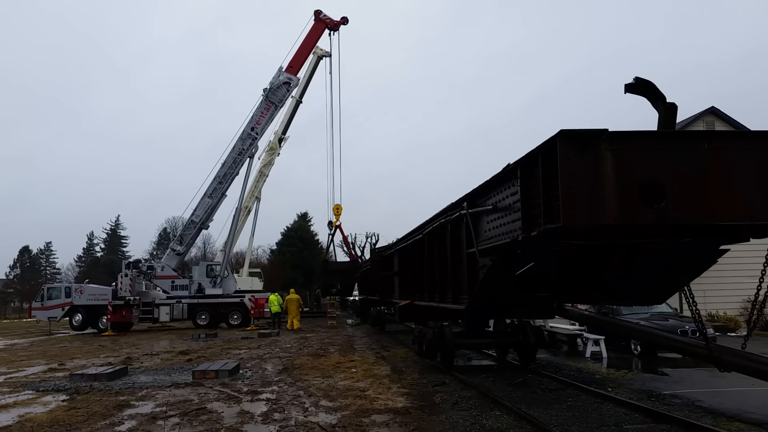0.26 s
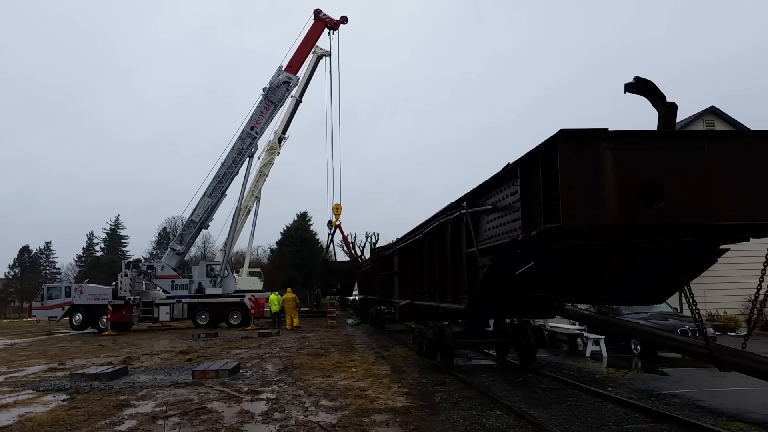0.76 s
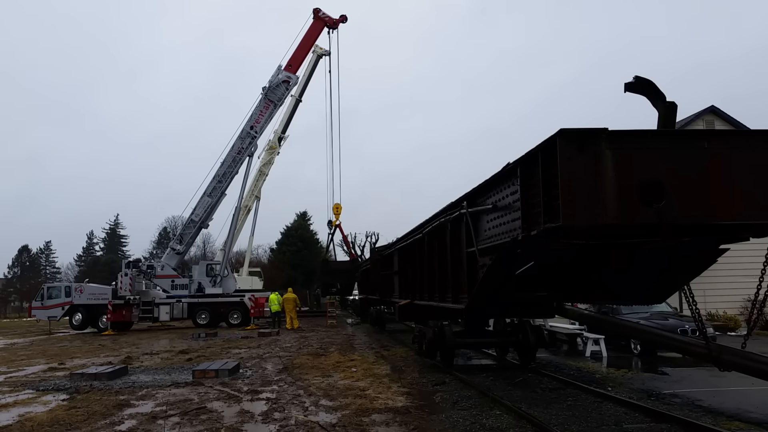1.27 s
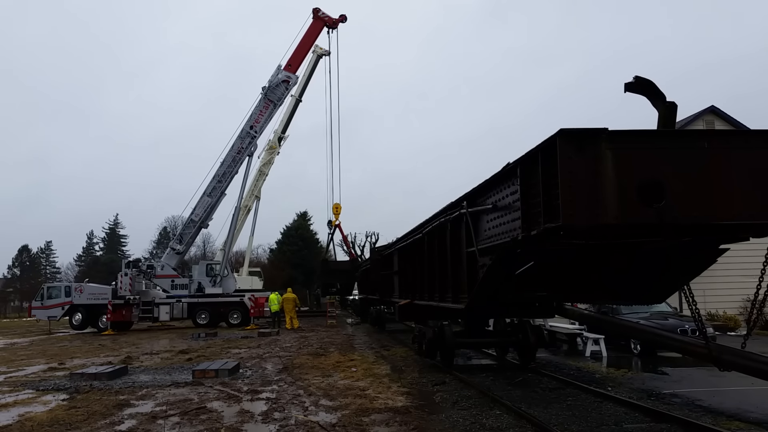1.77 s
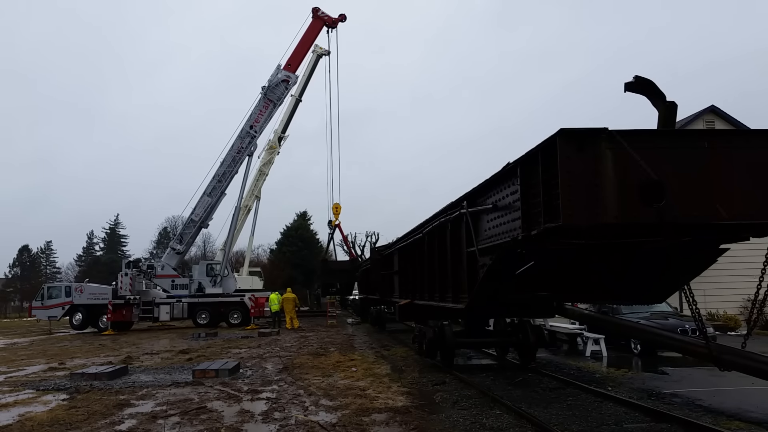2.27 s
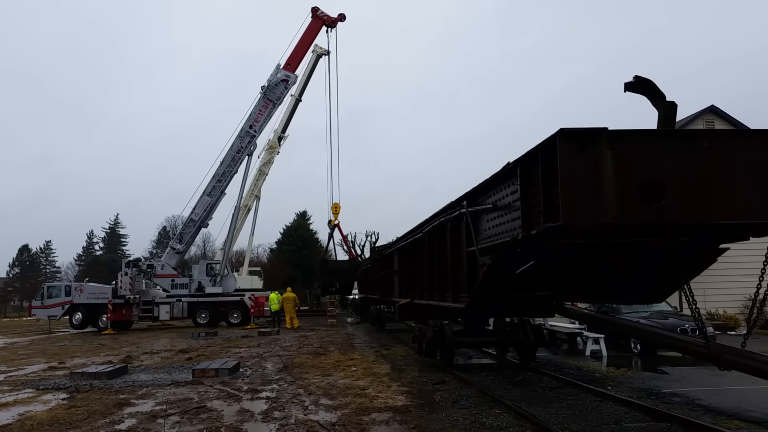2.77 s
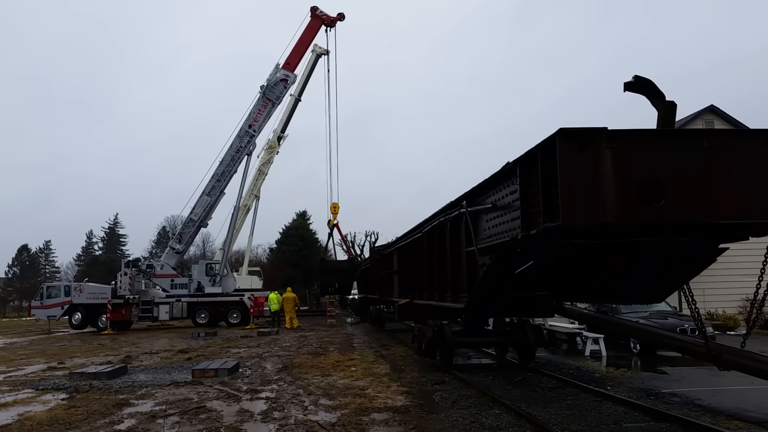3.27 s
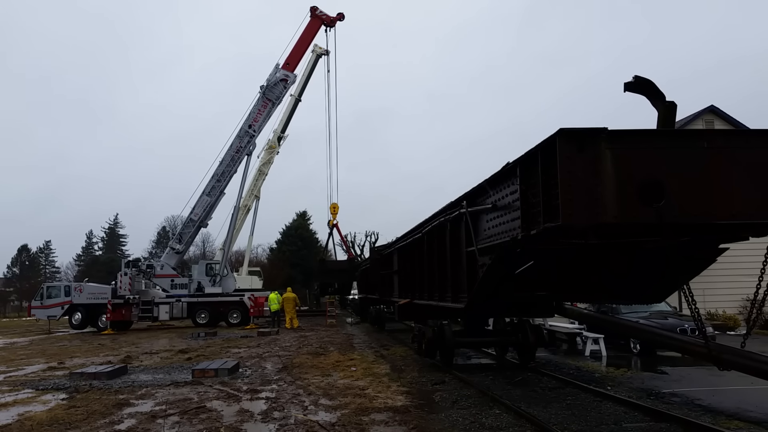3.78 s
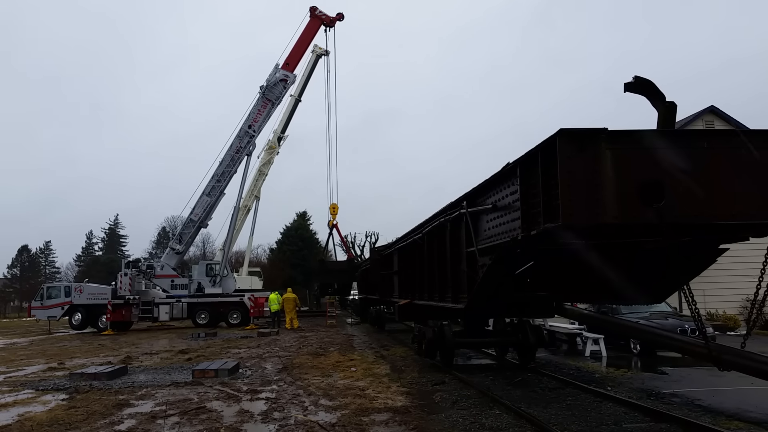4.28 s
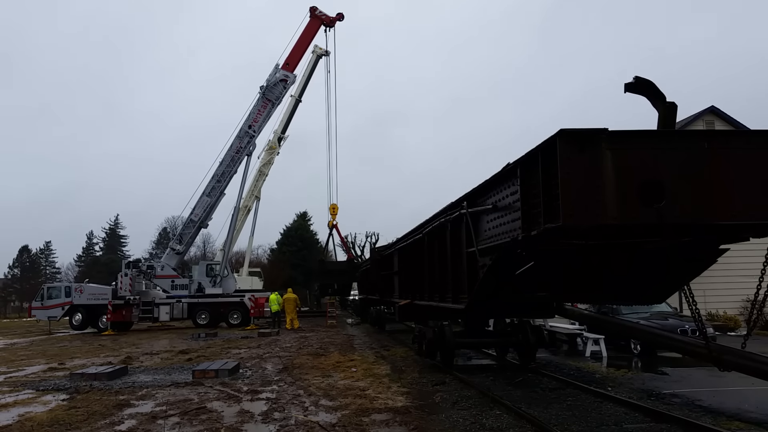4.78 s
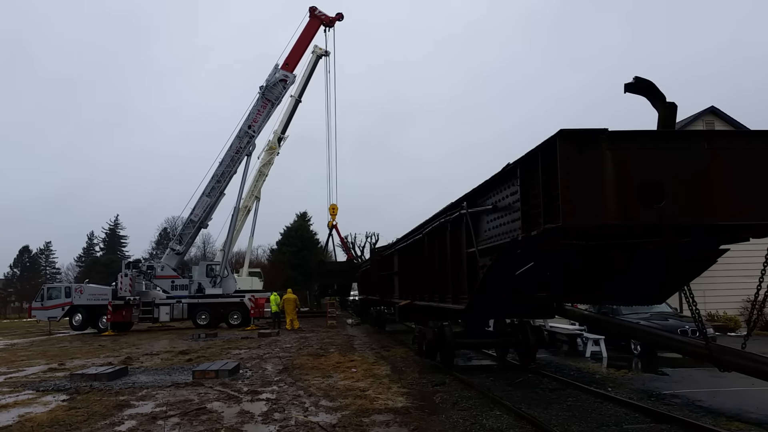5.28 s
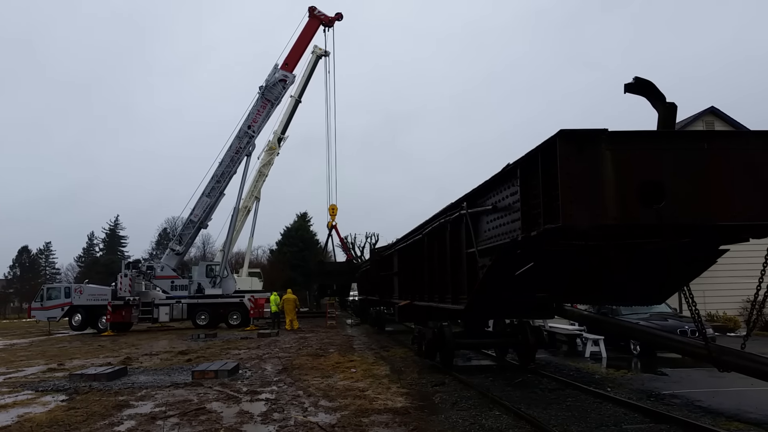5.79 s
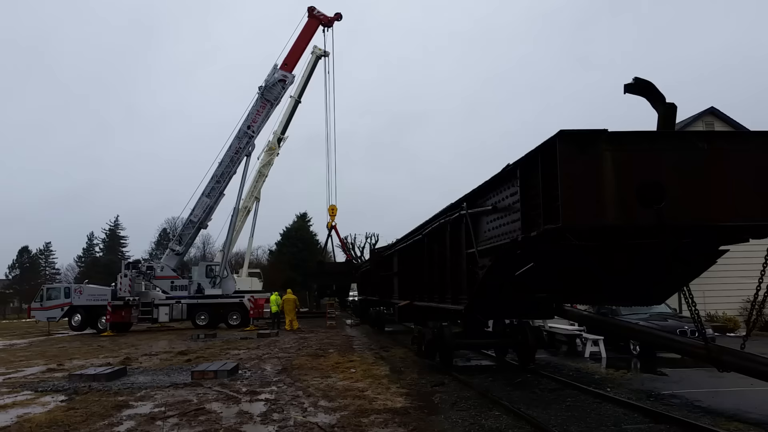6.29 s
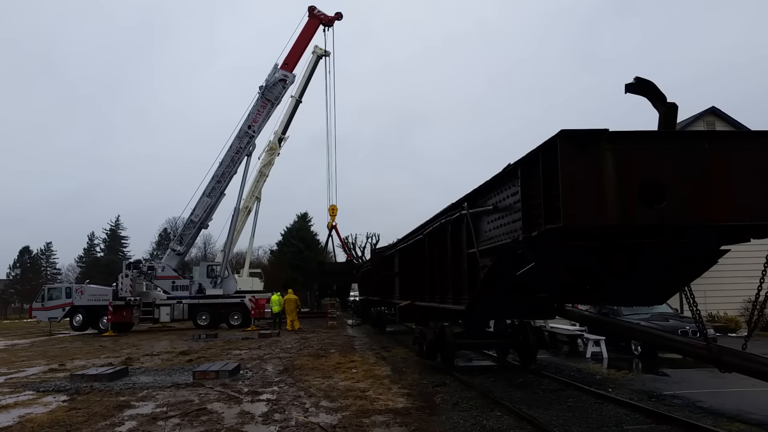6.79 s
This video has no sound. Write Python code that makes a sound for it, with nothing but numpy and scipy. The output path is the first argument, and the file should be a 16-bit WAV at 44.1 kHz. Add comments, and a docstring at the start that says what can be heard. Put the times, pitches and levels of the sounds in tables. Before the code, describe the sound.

Wind hits a camera's microphones hard, with deep uneven rumble, rasp and thumps differing left and right. Behind it a crane engine runs continuously, with a pump drone around middle C, a drifting fan tone and thin high whines. The background starts subdued, grows fuller and hissier, then drops away around six seconds, leaving dull overloaded gusts and crackling pops at left. Scattered raindrops click close by.

```python
"""Wind buffets a camera's two microphone ports, each on its own: shaped noise, with pops and crackle on the left.
Behind it a mobile crane works some way off beside a rail track: filtered-noise diesel roar and clatter,
a pump whine that comes and goes in waves and thin whistles on one shaft, beside a free, drifting fan tone.
Raindrops ring the camera body with short decaying modes, and spray clicks on the right port.
The whole background swells and sinks, and the hardest gusts round off in a dull overload."""
import sys
import numpy as np
from scipy import signal
from scipy.fft import rfft, irfft
from scipy.io import wavfile
from scipy.ndimage import uniform_filter1d

SR = 44100
rng = np.random.default_rng(int(sys.argv[2]) if len(sys.argv) > 2 else 0)


def transcribe(signal):
    """Save signal, clipped to [-1, 1], as a 16-bit WAV file at the path in sys.argv[1]."""
    frames = np.atleast_2d(signal).T
    limited = np.clip(frames, -1, 1)
    pcm = np.round(limited * 32767).astype(np.int16)
    wavfile.write(sys.argv[1], SR, pcm)


N = 310905
TIME = np.arange(N) / SR
HZ = np.fft.rfftfreq(N, 1 / SR)

# Guide for the swell of the whole background, as a high-hiss level: t/s, level/dB
SWELL = [(.03, -68), (.45, -68), (.65, -62.5), (.96, -59.5), (1.5, -56), (1.8, -56), (2.02, -54.5),
         (2.07, -58), (2.5, -59.5), (3, -58.5), (3.06, -54), (3.25, -55), (3.62, -52.3), (3.85, -54),
         (4.24, -51.3), (4.42, -51.8), (4.61, -50), (4.75, -51.5), (5.05, -50), (5.6, -50.5), (5.78, -51.5),
         (5.88, -55), (6.02, -59), (6.2, -69.5), (6.5, -68), (7, -71)]
SWELL_FULL_DB = -50.5  # guide level at which the background is at full strength
SWELL_WAVER_DB, SWELL_WAVER_HZ = 1.5, 2  # the background wavers a little by chance
# Brief surges of the whole background: t/s, rise/dB
SURGES = [(1.688, 4), (5.73, 1.5), (5.95, 2)]
SURGE_WIDTH_S = 0.017
# Wafts of wind that bring the crane nearer: t/s, half length/s, rise/dB
WAFTS = [(1.7, 0.19, 1), (4.206, 0.32, 1.5)]

# Microphone hiss before the swell: f/Hz, level/dB per Hz
HISS = [(5000, -125), (8700, -110), (10000, -102), (12300, -88.5), (14600, -82.5), (15800, -81.5)]
HISS_RIGHT_DB = 2.6  # extra hiss on the right
EDGE_HZ = 15900  # upper band limit

# Roar of the diesel and its fan at full swell: f/Hz, left level/dB per Hz, right level/dB per Hz
ROAR = [(59, -64, -59.5), (138, -57.5, -52), (248, -47.5, -46.5), (408.5, -55, -52), (423, -61, -64),
        (580, -64.5, -61), (770, -66.5, -69.5), (1300, -79, -80), (2110, -75, -78.5), (2300, -81.5, -88),
        (3050, -76.5, -78.5), (2860, -85, -86.5), (4350, -76, -90), (5200, -80.5, -104.5),
        (5430, -90.5, -101), (7370, -92.5, -104), (8800, -110, -110)]
# How alike the two ports hear the roar: f/Hz, likeness/0-1
LIKENESS = [(60, 0.06), (300, 1), (640, 0.8), (1400, 0.5), (3000, 0.4), (6000, 0.08)]
PORT_DELAY = 0.00011  # s by which the left port leads
# Resonances of the engine block: f/Hz, width/Hz, left level/dB per Hz
ENGINE_BLOCK = [(1075, 770, -74), (1810, 280, -76), (2120, 300, -81), (2740, 210, -83.5)]

PUMP_HZ, FIRING_HZ = 266.9, 123.1  # nominal, before the slight wander of the shaft
# Base level of the pump's fundamental: left level/dB, right level/dB
PUMP_DB = [-25.5, -24.5]
# Waves in the pump's hum, added to its base level: t/s, level/dB
PUMP_LEVEL = [(0, -2.5), (.5, -9.5), (1, -2), (1.3, -4), (1.63, 5), (1.85, -3), (2.3, -0.5), (2.48, -7),
              (2.9, -1), (3.08, -6.5), (3.33, 4), (3.7, 0), (3.97, -4.5), (4.15, 3), (4.38, 3.5), (4.55, 1),
              (5.1, 3.5), (5.42, 4), (5.66, 0), (5.8, -5.5), (6.25, -16), (7.05, -10.5)]
# Overtones of the pump whine: multiple of PUMP_HZ, left level/dB, right level/dB
PUMP_OVERTONES = [(2, -44.5, -42.5), (3, -51, -51.5)]
# Partials of the diesel's firing: multiple of FIRING_HZ, left level/dB, right level/dB
FIRING = [(3, -32, -32), (4, -51, -51), (5, -61.5, -57), (6, -52.5, -47), (7, -69, -65.5)]
# Thin whistles of gears and valves: f/Hz, left level/dB, right level/dB
WHISTLES = [(872, -60, -60), (1035, -63, -70), (1114, -62, -69), (1253, -59, -64), (1722, -60, -68),
            (2899, -67, -70), (2958, -68, -69), (3008, -64.5, -63), (3035, -71, -71), (3690, -72, -74),
            (4243, -71, -80), (4615, -65, -80), (4677, -65, -78), (4736, -69, -80)]
# Blade tone of the cooling fan, drifting with its load: t/s, f/Hz
FAN = [(0, 370.6), (.9, 371.6), (1.8, 385.2), (2.7, 383), (3.5, 374.6), (4.5, 381), (5.4, 372.2),
       (7.05, 374)]
FAN_DB = -41
# The whistles and the clatter sink, and stay down, in the last hard gusts
DIP_DB, DIP_S, DIP_LENGTH_S = -3.5, 6.0, .25

# Raindrops on the camera body: t/s, left peak/dB, favoured f/Hz, spread/octaves, ring/multiple of usual
DROPS = [(0.7432, -26, 3860, 0.44, 2.2), (2.0303, -26, 3000, 2.7, 1), (2.9489, -15, 1400, 1.3, 1.5),
         (3.1134, -9.5, 2720, 0.69, 1.4), (3.185, -24, 2500, 2, 1), (3.8897, -17, 4300, 0.98, 2),
         (4.008, -26, 2400, 1, 1), (4.529, -23, 4200, 1, 1), (4.659, -20, 4500, .8, 1),
         (4.918, -24, 3300, 1.5, 1), (5.165, -19.5, 4400, .8, 1.3), (5.192, -25, 4500, .6, 1.3),
         (6.0558, -22, 4600, .45, 1.3), (6.062, -14, 2000, 1.6, 1), (6.1112, -27.5, 4000, 0.56, 1.6),
         (6.131, -36, 4300, .7, 1), (6.7312, -33, 4200, .7, 1), (6.8931, -26, 2800, 1.4, 1)]
# Modes a drop rings in the camera body: nominal f/Hz, level/dB, usual t60/s
CAMERA_MODES = [(1100, -15.5, 0.0029), (1900, -2.5, 0.0014), (2640, -4, 0.003), (3130, -6, 0.0032),
                (3810, 0.5, 0.004), (4630, -0.5, 0.0026)]
# Fine spray ticks on the right port: t/s, peak/dB
SPRAY = [(.936, -33), (1.452, -29), (2.03, -35), (2.29, -33), (2.396, -34), (3.151, -22), (5.581, -18),
         (6.201, -38)]

# Single eddies that slap a port: t/s, port/0 left 1 right, relative level/dB, upper edge f/Hz, half length/s
BUFFETS = [(0.477, 1, -22.5, 297, 0.0056), (0.508, 1, -17.5, 288, 0.0029), (1.526, 0, -18, 380, 0.0052),
           (1.752, 0, -17.5, 268, 0.0069), (2.408, 0, -30, 300, 0.0012), (2.505, 0, -21, 333, 0.0089),
           (2.997, 1, -13.5, 181, 0.0046), (5.827, 0, -17, 418, 0.0012), (5.889, 0, -12, 280, 0.0032),
           (5.952, 0, -21, 350, 0.0015), (6.022, 0, -18.5, 350, 0.002), (6.074, 1, -18, 534, 0.0042),
           (6.091, 1, -16, 324, 0.0038), (6.114, 0, -24, 497, 0.0019), (6.174, 0, -42, 401, 0.0018),
           (6.193, 0, -19, 276, 0.0023), (6.256, 0, -22, 391, 0.0029), (6.337, 0, -13, 251, 0.0042),
           (6.479, 0, -24.5, 397, 0.0016), (6.664, 0, -26.5, 400, 0.0042), (6.762, 0, -26.5, 560, 0.0026),
           (6.769, 0, -21, 370, 0.0011), (6.888, 0, -29, 450, 0.011), (6.934, 0, -23, 400, 0.0024)]
# Sharp pops where the airflow breaks at the left port: t/s, peak/dB, upper edge f/Hz
POPS = [(1.523, -15, 600), (2.418, -29, 700), (5.83, -14, 650), (5.886, -17.5, 700), (5.911, -21, 700),
        (6.069, -17, 1100), (6.116, -25, 1200), (6.197, -18.5, 1100), (6.1997, -9, 1700),
        (6.2220, -19, 1900), (6.225, -13, 1370), (6.257, -25.5, 900), (6.264, -25.5, 1700),
        (6.3329, -12.5, 1100), (6.34, -17.5, 1100), (6.637, -32, 700), (6.712, -19, 1030),
        (6.762, -16, 1100), (6.9077, -14, 1210), (6.931, -19, 750), (6.9425, -20, 1600), (6.959, -27, 750),
        (6.985, -27, 750), (7.019, -28, 1900), (7.0255, -13, 990), (7.036, -15, 1400)]
# Slowly changing breeze beneath the gusts: t/s, left strength/dB, right strength/dB
BREEZE = [(0, -38.5, -20), (0.799, -36.5, -33.5), (1.298, -34.5, -20), (2.2, -31, -30), (2.747, -23, -26),
          (3.601, -29, -30.5), (4.248, -27, -26.5), (5.3, -22.5, -28), (6.3, -15.5, -27),
          (7.05, -15.5, -33)]
# Separate gusts that catch a port: start t/s, length/s, port/0 left 1 right, strength/dB
GUSTS = [(0.122, 0.05, 1, -22), (0.344, 0.19, 1, -23), (0.673, 0.055, 1, -19.5), (0.89, .06, 0, -19),
         (1.085, 0.038, 0, -20.5), (1.15, 0.044, 1, -24), (1.284, .04, 1, -26.5), (1.396, 0.22, 1, -18),
         (1.443, 0.73, 0, -15), (1.889, 0.035, 1, -16.5), (2.348, 0.24, 0, -12), (2.451, .08, 1, -22),
         (2.844, 0.17, 1, -20.5), (3.067, 0.34, 0, -19), (3.724, 0.37, 0, -14.5), (4.128, 0.08, 1, -19.5),
         (4.293, 0.052, 0, -13.5), (4.397, 0.16, 1, -20.5), (4.556, 0.3, 0, -15), (4.891, 0.47, 0, -16),
         (5.481, 0.27, 0, -12), (5.774, 0.47, 0, -11.5), (5.9, 0.18, 1, -15.5), (6.423, 0.22, 1, -24.5),
         (6.783, .035, 1, -25), (6.892, 0.33, 0, -11), (6.968, 0.03, 1, -19)]
GUST_ATTACK_S, GUST_RELEASE_S = 0.035, 0.08  # every gust builds quickly, holds, and dies away
# Colour of the wind's pressure on a port: f/Hz, relative level/dB per Hz
RUMBLE = [(8, -1.5), (22, -29.5), (55, -1.5), (115, 0), (200, -7.5), (300, -29), (450, -29.5), (800, -47.5),
          (2000, -113)]
# Colour of the rasp of its small eddies: f/Hz, relative level/dB per Hz
RASP = [(90, -21.5), (175, 1), (250, 4.5), (400, -10), (650, -18), (1000, -29), (1800, -50), (4000, -78)]


def amp(db):
    """Decibels to gain."""
    return 10 ** (np.asarray(db) / 20)


def unit(x):
    """Scales to rms 1."""
    return x / np.sqrt(np.mean(x ** 2) + 1e-20)


def curve(rows):
    """Joins (s, value) rows by straight lines."""
    return np.interp(TIME, *np.transpose(rows))


def spectrum(rows, column=1):
    """Reads one column of (Hz, ..) rows on a log-frequency axis."""
    columns = np.transpose(rows)
    return np.interp(np.log(HZ + 1), np.log(columns[0]), columns[column])


def white():
    """Spectrum of white noise at 0 dB per Hz."""
    return rfft(rng.standard_normal(N)) * np.sqrt(SR / 2)


def wander(rate):
    """Slow chance movement of rms 1, up to about rate changes a second."""
    return unit(irfft(white() * (HZ > 0) / (1 + (HZ / rate) ** 4), N))


def bump(centre_s, width_s):
    """A smooth rise to 1 and back."""
    return np.exp(-((TIME - centre_s) / width_s) ** 2 / 2)


def add(track, s, sound):
    """Adds a sound to a track at time s."""
    part = track[max(round(s * SR), 0):][:len(sound)]
    part += sound[:len(part)]


def background():
    """Strength of everything behind the wind in dB: a slow swell that wavers, and a few brief surges."""
    surges = sum(db * bump(s, SURGE_WIDTH_S) for s, db in SURGES)
    return curve(SWELL) - SWELL_FULL_DB + SWELL_WAVER_DB * wander(SWELL_WAVER_HZ) + surges


def hiss(swell_db, top_follow=0.95, lower_follow=2.5, split_hz=12500):
    """High hiss, unrelated in the two microphones; below the split it fades faster than above as levels sink."""
    top_share = 1 / (1 + (split_hz / (HZ + 1)) ** 16)
    noise = np.array([amp(db) * white() * amp(spectrum(HISS)) for db in (0, HISS_RIGHT_DB)])
    top = irfft(noise * top_share, N)
    lower = irfft(noise * (1 - top_share), N)
    return amp(top_follow * swell_db) * top + amp(lower_follow * swell_db) * lower


def wafts():
    """Rise in dB as the wind carries the crane's sound toward the camera."""
    return sum(db * bump(s, width) for s, width, db in WAFTS)


def roar(shaft, swell_db, throb=0.08, flutter_db=1.0, bass_follow=0.43, treble_follow=1.027,
         air_follow=1.65, split_hz=430, air_hz=5450):
    """Engine and fan noise, pulsing with the firing and fluttering in the wind; higher bands swell more."""
    same = np.clip(spectrum(LIKENESS), 0, 1)
    left = white()
    delayed = left * np.exp(-2j * np.pi * HZ * PORT_DELAY)
    right = same * delayed + np.sqrt(1 - same ** 2) * white()
    both = np.array([left * amp(spectrum(ROAR)), right * amp(spectrum(ROAR, column=2))])
    bass = 1 / (1 + (HZ / split_hz) ** 8)
    below_air = 1 / (1 + (HZ / air_hz) ** 60)
    bands = [(bass, bass_follow), (below_air - bass, treble_follow), (1 - below_air, air_follow)]
    noise = sum(amp(follow * swell_db) * irfft(both * share, N) for share, follow in bands)
    pulse = 1 + throb * np.cos(2 * np.pi * FIRING_HZ * shaft)
    return noise * pulse * amp(flutter_db * wander(19.0))


def clatter(shaft, right_db=-5, throb=0.1):
    """Combustion knocks keep the engine block ringing: resonant noise, heard mostly at the left port."""
    power = sum(amp(2 * db) / (1 + (2 * (HZ - hz) / width) ** 2) ** 2 for hz, width, db in ENGINE_BLOCK)
    body = np.sqrt(power)
    knocks = 1 + throb * np.cos(2 * np.pi * FIRING_HZ * shaft)
    return np.array([amp(db) * knocks * irfft(white() * body, N) for db in (0, right_db)])


def tone(turns, hz, levels_db, scatter, scatter_hz):
    """A steady partial plus its share scattered by moving air and by the rail car, at both ports."""
    scattered = scatter * (wander(scatter_hz) + 1j * wander(scatter_hz))
    path = (1 + scattered) / np.sqrt(1 + 2 * scatter ** 2)
    wave = np.sqrt(2) * path * np.exp(2j * np.pi * turns)
    lag = np.exp(-2j * np.pi * hz * PORT_DELAY)
    return amp(levels_db)[:, None] * np.real([wave, wave * lag])


def whine(shaft, swell_db, dip_db, whine_follow=0.65, whistle_follow=0.41, hum_scatter=0.31):
    """Pump hum carried in waves by the wind; overtones, firing and whistles on the shaft; a free fan tone."""
    hum = tone(PUMP_HZ * shaft, PUMP_HZ, PUMP_DB, scatter=hum_scatter, scatter_hz=18)
    hum = amp(curve(PUMP_LEVEL)) * hum
    # higher overtones scatter more
    pump = sum(tone(k * PUMP_HZ * shaft, k * PUMP_HZ, db, scatter=.3 * k ** .7, scatter_hz=6)
               for k, *db in PUMP_OVERTONES)
    firing = sum(tone(k * FIRING_HZ * shaft, k * FIRING_HZ, db, scatter=2.8, scatter_hz=9)
                 for k, *db in FIRING)
    whistles = sum(tone(hz * shaft, hz, db, scatter=.33, scatter_hz=4) for hz, *db in WHISTLES)
    fan_turns = np.cumsum(curve(FAN)) / SR
    fan = tone(fan_turns, FAN[0][1], [FAN_DB, FAN_DB], scatter=0.91, scatter_hz=18)
    swelling = amp(whine_follow * swell_db) * (pump + firing + fan)
    return hum + swelling + amp(whistle_follow * swell_db + dip_db) * whistles


def drizzle():
    """About five small drops a second at random moments, louder as the background swells."""
    gap, size, colour = rng.random((60, 3)).T
    times = np.cumsum(-np.log(gap) / 5)
    swell_db = np.interp(times, *np.transpose(SWELL)) - SWELL_FULL_DB
    levels_db = swell_db - 35 + 8 * size ** 2
    return [(s, db, 2000 + 3000 * c, 1, 1) for s, db, c in zip(times, levels_db, colour)]


def drops(rows, right_db=-22):
    """Drops land by the left port and ring the camera body very briefly; each spot favours its own modes."""
    out, t = np.zeros(N), np.arange(900) / SR
    dull = signal.butter(6, 5400, fs=SR, output="sos")
    for s, db, centre_hz, octaves, ring in rows:
        tick = 0
        for hz, mode_db, t60 in CAMERA_MODES:
            decay = amp(mode_db - 60 * t / (ring * t60))
            favour = 1 / (1 + (np.log2(hz / centre_hz) / octaves) ** 2) ** 2
            tick = tick + decay * favour * np.sin(2 * np.pi * hz * rng.uniform(0.94, 1.03) * t)
        tick = signal.sosfilt(dull, tick)
        add(out, s, amp(db) * tick / abs(tick).max())
    return np.array([out, amp(right_db) * out])


def spray(low_hz=12000):
    """Tiny droplets strike the right port with a bare, high click: a band-passed impulse."""
    out = np.zeros((2, N))
    band = signal.butter(3, [low_hz, EDGE_HZ], "band", fs=SR, output="sos")
    click = signal.sosfilt(band, signal.unit_impulse(128))
    for s, db in SPRAY:
        add(out[1], s, amp(db) * click / abs(click).max())
    return out


def crackle(level_db=-17, slips_per_s=300, decay_s=0.019, low_hz=450):
    """After each pop the torn flow keeps slipping at the port: a short, uneven train of smaller pops."""
    out, t = np.zeros((2, N)), np.arange(4000) / SR
    for s, db, edge_hz in POPS:
        struck = rng.random(len(t)) < slips_per_s / SR
        slips = struck * rng.uniform(-1, 1, len(t)) * np.exp(-t / decay_s)
        band = signal.butter(2, [min(low_hz, edge_hz / 2), edge_hz], "band", fs=SR, output="sos")
        slip = signal.sosfilt(band, signal.unit_impulse(300))
        add(out[0], s, amp(db + level_db) * np.convolve(slips, slip / abs(slip).max()))
    return out


def pops(low_hz=330, rattle=0.042, rattle_s=0.0025):
    """A sudden step of pressure leaks away within a millisecond; the broken flow rattles briefly after it."""
    out, t = np.zeros((2, N)), np.arange(900) / SR
    leak = signal.butter(2, low_hz, "high", fs=SR, output="sos")
    dull = signal.butter(4, 5400, fs=SR, output="sos")
    for s, db, edge_hz in POPS:
        rise = signal.butter(3, edge_hz, fs=SR, output="sos")
        step = 1 + np.cumsum(rattle * np.exp(-t / rattle_s) * rng.standard_normal(len(t)))
        pop = signal.sosfilt(np.vstack([leak, rise, dull]), step)
        add(out[0], s, amp(db) * pop / abs(pop).max())
    return out


def buffets(level_db=5, low_hz=260):
    """Each eddy is a millisecond-scale puff of noise; the harder its edge, the higher it reaches."""
    out, t = np.zeros((2, N)), np.arange(-1024, 1024) / SR
    hz = np.fft.rfftfreq(len(t), 1 / SR)
    for s, port, db, edge_hz, length in BUFFETS:
        colour = hz ** 2 / (hz ** 2 + low_hz ** 2) / (1 + (hz / edge_hz) ** 4)
        shape = np.exp(-(t / length) ** 2 / 2)
        puff = irfft(rfft(rng.standard_normal(len(t)) * shape) * colour)
        puff = puff * np.linalg.norm(shape) / np.linalg.norm(puff)  # same energy whatever the colour
        add(out[port], s + t[0], amp(db + level_db) * puff)
    return out


def airflow(channel):
    """Wind strength in dB at one port: the breeze plus its gusts, each with an attack, a hold and a release."""
    power = amp(2 * curve([(s, db[channel]) for s, *db in BREEZE]))
    for start, length, port, db in GUSTS:
        if port == channel:
            rise = np.clip((TIME - start) / GUST_ATTACK_S, 0, 1)
            fall = np.clip(1 - (TIME - start - length) / GUST_RELEASE_S, 0, 1)
            power = power + (amp(db) * rise * fall) ** 2
    return 10 * np.log10(power)


def wind(flow_db, rumble_db, rasp_db, throb_db, deep_db, rasp_growth=1.114, deep_growth=0.85, deep_hz=75):
    """Turbulence at one port: throbbing rumble, deep heaves, and a rasp that gets lumpier in a hard gust."""
    strength_db = flow_db + throb_db * wander(25.0)
    pressure = unit(irfft(white() * amp(spectrum(RUMBLE)), N))
    local_power = uniform_filter1d(pressure ** 2, size=8000)
    pressure = unit(pressure / np.sqrt(local_power))  # evened out, so the gust sets the size of the swings
    deep_noise = irfft(white() * HZ / (HZ + 20) / (1 + (HZ / deep_hz) ** 6), N)
    heaves = unit(deep_noise * amp(3.5 * np.minimum(wander(9), 1.3)))
    lumps_db = np.interp(flow_db, [-24, -14], [3, 5.3])
    lumps = amp(lumps_db * np.minimum(wander(55), 1.7))
    rasp = unit(irfft(white() * amp(spectrum(RASP)), N) * lumps)
    rumble = amp(strength_db + rumble_db) * pressure
    deep = amp(deep_growth * flow_db + deep_db) * heaves
    return rumble + deep + amp(rasp_growth * strength_db + rasp_db) * rasp


def scene(clatter_follow=0.47):
    """The crane behind, wind and rain on the camera."""
    shaft = np.cumsum(1 + 0.00067 * wander(1.9)) / SR  # s; the governor holds the speed almost still
    swell_db = background()
    dip_db = DIP_DB * np.clip((TIME - DIP_S) / DIP_LENGTH_S, 0, 1)
    crane_db = swell_db + wafts()
    crane = roar(shaft, crane_db) + whine(shaft, crane_db, dip_db)
    crane = crane + amp(clatter_follow * crane_db + dip_db) * clatter(shaft)
    left_wind = wind(airflow(0), rumble_db=0.5, rasp_db=-10.5, throb_db=1.45, deep_db=-10.5)
    right_wind = wind(airflow(1), rumble_db=1.0, rasp_db=-5.5, throb_db=3.5, deep_db=-7.5)
    gusts = np.array([left_wind, right_wind])
    rain = drops(DROPS + drizzle()) + spray()
    return crane + hiss(swell_db) + gusts + buffets() + pops() + crackle() + rain


def record(dry):
    """The hardest gusts are rounded off by a dull overload; then the band limit."""
    excess = dry - dry / (1 + (dry / .93) ** 6) ** (1 / 6)
    dull = signal.firwin(101, 2500, window=("kaiser", 9), fs=SR)
    rounded = dry - signal.oaconvolve(excess, dull[None], "same")
    band_limit = signal.firwin(511, EDGE_HZ, window=("kaiser", 9), fs=SR)
    return signal.oaconvolve(rounded, band_limit[None], "same")


dry = scene()
out = record(dry)
transcribe(out)
```